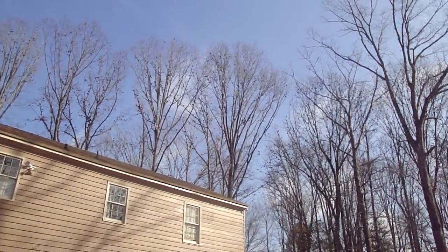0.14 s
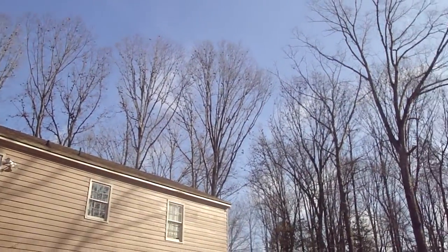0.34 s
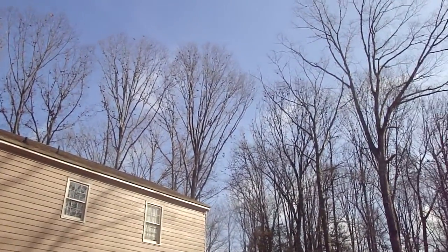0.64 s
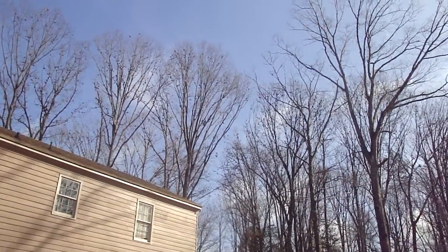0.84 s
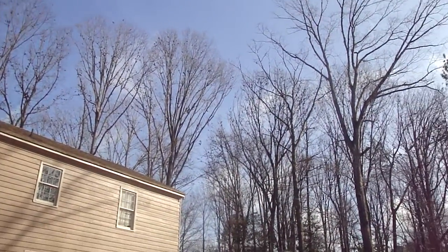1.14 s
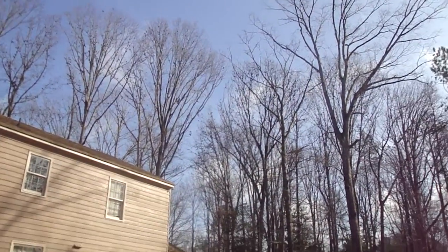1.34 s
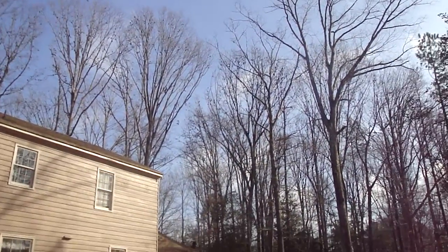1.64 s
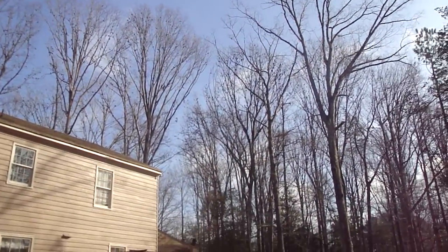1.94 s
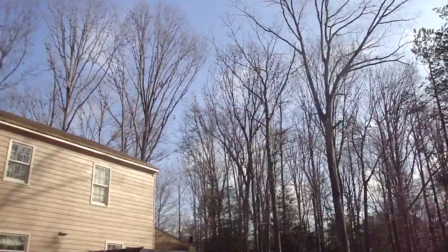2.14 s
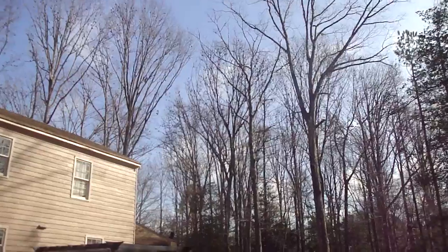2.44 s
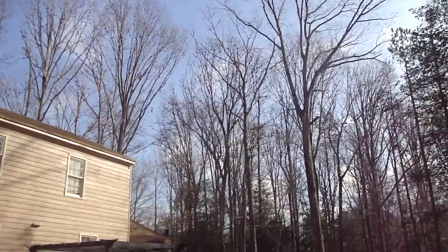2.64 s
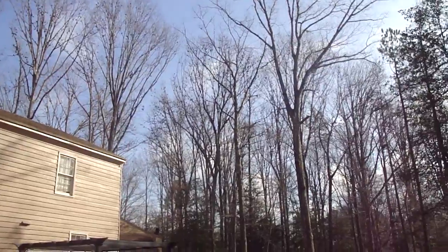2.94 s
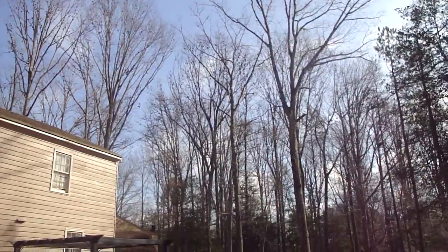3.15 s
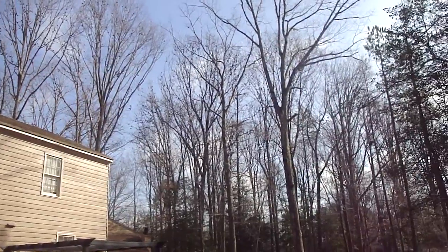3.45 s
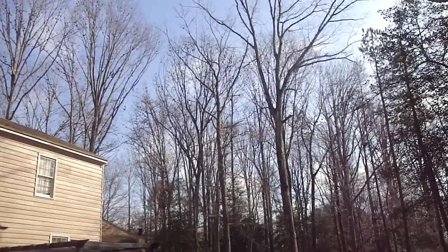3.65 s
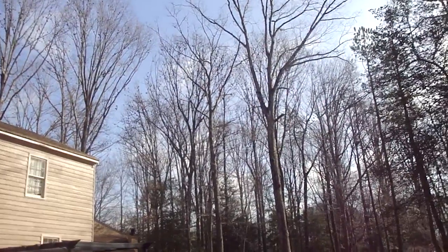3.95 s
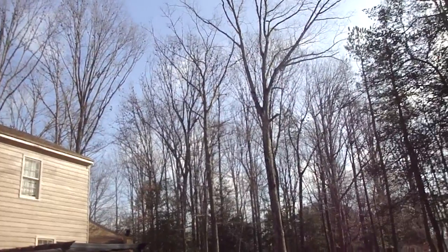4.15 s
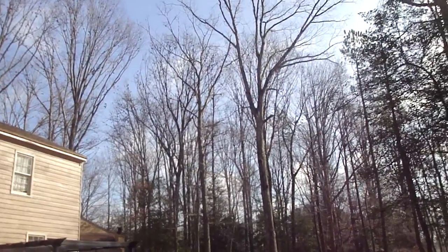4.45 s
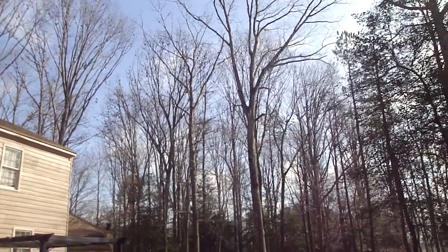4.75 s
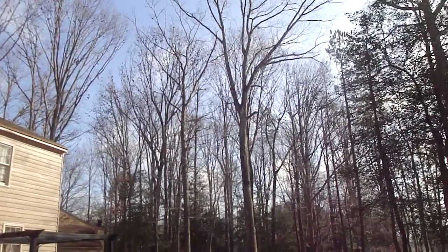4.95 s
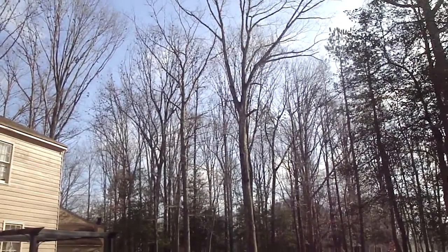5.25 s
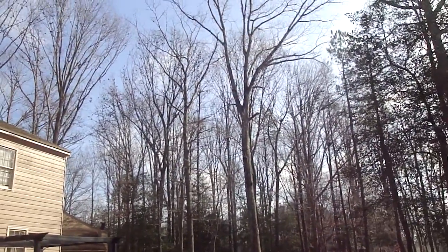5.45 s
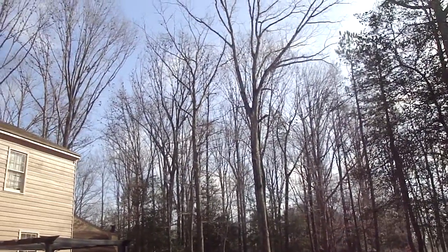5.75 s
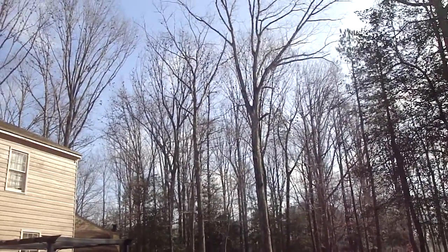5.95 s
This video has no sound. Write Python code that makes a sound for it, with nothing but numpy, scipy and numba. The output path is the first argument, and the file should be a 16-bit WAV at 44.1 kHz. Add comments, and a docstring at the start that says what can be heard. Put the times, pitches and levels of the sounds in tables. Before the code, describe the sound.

Steady outdoor bird din from start to end: hundreds of overlapping tiny calls form a grainy hiss, strongest in the middle-high range. Nearer birds add clear squeaks, thin high whistles and noisy rasps, sometimes clustered, sometimes sparse. The level flutters slightly but never stops. Barely audible dove coos come around three seconds and again near five. Faint low town rumble, short woodland echo, mono small-camera sound.

```python
"""Hundreds of blackbirds chatter in bare trees beyond a house, heard by a small mono camera microphone.
The nearest squeaks and squeals are frequency-modulated tones; rasps are the same with far wider modulation.
Near calls ring in a short scattered echo from the trunks. A middle crowd calls at random within the noise hiss
of far birds, over a town murmur of low-passed noise; a dove, slow gliding tones, coos faintly low down."""
import sys
import numpy as np
from scipy import signal
from scipy.fft import rfft, irfft
from scipy.io import wavfile
from scipy.ndimage import uniform_filter1d
from numba import njit

SR = 44100
rng = np.random.default_rng(int(sys.argv[2]) if len(sys.argv) > 2 else 0)


def bounce(signal):
    """Save signal as a 16-bit WAV file at the path given by the first command-line argument."""
    frames = np.transpose(np.atleast_2d(signal))
    limited = np.clip(frames, -1, 1)
    pcm = np.round(limited * 32767).astype(np.int16)
    wavfile.write(sys.argv[1], SR, pcm)


N = 268480  # samples in the scene


def undb(db):
    """Amplitude ratio: 20 dB is a factor of ten."""
    return 10 ** (np.asarray(db) / 20)


def level(x, db):
    """Normalisation: scale the signal to an RMS level in dB re 1."""
    return x * undb(db) / np.sqrt(np.mean(x ** 2))


def walk(rate_hz):
    """Low-passed noise: random values held 1 / rate_hz s, averaged twice over that time, scaled to spread 1."""
    hold = max(int(SR / rate_hz), 2)
    steps = np.repeat(rng.standard_normal(N // hold + 1), hold)
    smooth = uniform_filter1d(uniform_filter1d(steps, hold), hold)[:N]
    return smooth / np.std(smooth)


@njit
def syrinx(calls, shake, edge, buzz):
    """Frequency and amplitude modulation: one shaken tone per row.

    Row: t/s, duration/s, start, middle and end f/Hz, wobble/Hz per unit shake, peak amplitude before buzz.
    edge is the share of a call spent rising, and again falling; buzz is the depth of amplitude shaking.
    """
    out = np.zeros(len(shake))
    for k in range(len(calls)):
        start, size = int(calls[k, 0] * SR), int(calls[k, 1] * SR)
        first, middle, last = calls[k, 2], calls[k, 3], calls[k, 4]
        phase = 0.
        for i in range(min(size, len(out) - start)):
            u = i / size
            chance = (start + i + 7919 * k) % len(shake)  # each call reads another stretch of the shake
            # parabola through the three pitches
            bend = first * (1 - u) * (1 - 2 * u) + 4 * middle * u * (1 - u) + last * u * (2 * u - 1)
            phase += 2 * np.pi * (bend + calls[k, 5] * shake[chance]) / SR
            swell = np.sin(np.pi / 2 * min(1., min(u, 1 - u) / edge))
            size_shake = 1 + buzz * shake[chance - 5000]  # apart from the pitch shake
            out[start + i] += calls[k, 6] * swell * size_shake * np.sin(phase)
    return out


def tones(rows, wobble_hz, shake_hz, edge, buzz):
    """Nearly periodic oscillation: a small random wobble leaves gliding calls almost pure."""
    s, length, hz, glide, db = np.transpose(rows)
    middle_hz = hz + 0.62 * glide  # 62 % of the glide is done halfway through
    wobble = np.full(len(s), wobble_hz)
    amplitude = np.sqrt(2) * undb(db)  # sine peak from RMS level
    calls = np.column_stack([s, length, hz, middle_hz, hz + glide, wobble, amplitude])
    return syrinx(calls, walk(shake_hz), edge, buzz)


def trunks(x):
    """Multiple scattering: direct sound plus decaying random reflections from trunks and the house wall."""
    t60_s, scatter_db, onset_s = 0.2, -12.5, 0.0064
    t = np.arange(int(t60_s * SR)) / SR
    decay = undb(-60 * t / t60_s)
    tail = rng.standard_normal(len(t)) * decay * np.minimum(t / onset_s, 1)
    tail /= np.sqrt(np.sum(tail ** 2))
    return x + undb(scatter_db) * signal.fftconvolve(x, tail)[:N]


def crowd():
    """Random superposition: middle-distance birds call at random moments, pitches and distances."""
    count = 9000
    draw = rng.random((count, 7)).T
    start_s = draw[0] * N / SR
    length_s = 0.0148 + 0.068 * draw[6] ** 2
    hz = 1800 + 9200 * draw[1]
    glide = 1 + 0.03987 * (2 * draw[2:4] - 1)  # pitch ratios of the two halves
    middle_hz = hz * glide[0]
    end_hz = middle_hz * glide[1]
    wobble_hz = np.where(draw[4] < 0.6, 30 + 400 * draw[4], 1400.)  # clear to hoarse squeak, or wide rasp
    amplitude = undb(15.4 * draw[5] ** 2)  # few are near and loud
    calls = np.column_stack([start_s, length_s, hz, middle_hz, end_hz, wobble_hz, amplitude])
    return syrinx(calls, np.tanh(walk(1500.)), edge=0.12, buzz=0.23)


def flock():
    """Spectral shaping: hiss and crowd share one colour; two bird bands swell apart over a town murmur."""
    # base levels of the flock: t/s, low voices level/dB, shrill voices level/dB
    liveliness = [(0, -33.5, -37), (.64, -33.5, -40), (1, -34, -38.5), (2.17, -32.5, -39),
                  (2.9, -33.5, -38), (3.22, -33.5, -38.5), (3.58, -32, -37.5), (3.85, -33.5, -36.5),
                  (4.25, -33.5, -37), (4.51, -33.5, -36.5), (4.78, -32.5, -39.5), (5.02, -33, -39.5),
                  (5.2, -33.5, -35.5), (5.5, -32.5, -37.5), (6.09, -33.5, -38.5)]
    # colour of flock, air and microphone together, before the bands are levelled: f/Hz, relative density level/dB
    colour = [(15, -69), (25, -42.5), (140, -23.5), (386, -22), (728, -15.5), (1240, -6.5), (2280, -2.5),
              (3170, -1), (4410, -8), (7700, -10.5), (10700, -28.5), (22000, -57)]
    crowd_share, shrill_hz, murmur_db, bout_db = 0.29, 3980, -53.5, 0.6  # share is of power

    hz = np.maximum(np.arange(N // 2 + 1) * SR / N, 1.)
    colour_hz, colour_db = np.transpose(colour)
    gain = undb(np.interp(np.log(hz), np.log(colour_hz), colour_db))
    far = rfft(level(rng.standard_normal(N), 0)) * gain
    middle = rfft(level(trunks(crowd()), 0)) * gain
    share = crowd_share / (1 + (2600 / hz) ** 6)  # lower down only the hiss of far birds is left
    both = np.sqrt(1 - share) * far + np.sqrt(share) * middle

    shrill = 1 / (1 + (shrill_hz / hz) ** 6)
    birds = 1 / (1 + (700 / hz) ** 4)
    low = level(irfft(both * birds * (1 - shrill), N), 0)
    high = level(irfft(both * shrill, N), 0)
    town = level(irfft(both * (1 - birds), N), 0)

    time = np.arange(N) / SR
    s, low_db, shrill_db = np.transpose(liveliness)
    bouts = bout_db * walk(6.32)  # neighbours set each other off in short bouts
    low_voices = low * undb(np.interp(time, s, low_db) + bouts)
    shrill_voices = high * undb(np.interp(time, s, shrill_db) + 2 * bouts)
    return low_voices + shrill_voices + town * undb(murmur_db)


def dove():
    """Slow modulation: a barely shaken low tone is heard as a soft coo."""
    # coos: t/s, duration/s, start f/Hz, glide/Hz, level/dB
    coos = [(2.8, .66, 488, -5, -61), (4.5, .34, 490, -18, -57.5), (4.93, .64, 482, -3, -59.5)]
    return tones(coos, wobble_hz=2., shake_hz=10., edge=0.2, buzz=0.15)


def rasps():
    """Chaotic vibration: membrane flapping throws the pitch over a wide band, with a faint octave above."""
    # harsh rasps of near birds: t/s, duration/s, nominal centre f/Hz (sounded 1 % lower), level/dB
    harsh_calls = [(0, 0.054, 8400, -47), (0.114, 0.091, 7770, -39.5), (0.206, 0.11, 2190, -38.5),
                   (0.247, 0.13, 5930, -37), (0.797, 0.15, 2870, -37), (1.03, 0.13, 3710, -42),
                   (1.055, 0.09, 5920, -41), (1.29, 0.15, 3185, -36), (1.58, 0.18, 4860, -35.5),
                   (1.72, 0.14, 4520, -37), (2.304, 0.12, 6580, -43), (2.371, 0.1, 3220, -49),
                   (2.435, 0.15, 7300, -44), (2.773, 0.15, 4620, -39), (2.835, 0.072, 8050, -47),
                   (3.089, 0.13, 5570, -35.5), (3.57, 0.12, 3980, -37), (3.94, 0.051, 5020, -36),
                   (4.056, 0.15, 4500, -36.5), (4.189, 0.076, 5700, -41), (4.46, 0.062, 8700, -43),
                   (4.55, 0.14, 8950, -48), (4.597, .075, 3650, -41), (5.001, 0.067, 8480, -49),
                   (5.056, 0.19, 4790, -42), (5.22, 0.2, 5820, -41), (5.342, 0.055, 9500, -49),
                   (5.526, 0.14, 5780, -38), (5.646, 0.089, 4920, -39), (5.865, 0.14, 4470, -40),
                   (6.01, 0.077, 5650, -42)]
    width_hz, octave_db = 2000, -15.5  # width per unit of frequency ratio; octave re the fundamental
    s, length, hz, db = np.transpose(harsh_calls)
    flap = np.tanh(walk(1800.))

    def partial(ratio, over_db):
        """Harmonic scaling: pitch and its swing are multiplied by the same ratio."""
        pitch = ratio * hz
        swing = np.full(len(s), 0.5 * ratio * width_hz)
        amplitude = np.sqrt(2) * undb(db + over_db)
        return np.column_stack([s, length, pitch, pitch, pitch, swing, amplitude])

    calls = np.vstack([partial(0.99, 0), partial(2, octave_db)])
    return syrinx(calls, flap, edge=0.42, buzz=0.4)


def squeals():
    """Random point process: rows of fairly near calls scattered around the flock's usual pitch."""
    # swells of the squealing: t/s, softest call level/dB
    chatter = [(0, -49), (.3, -50.5), (.7, -54), (.9, -48), (1.1, -53), (1.35, -48), (1.55, -47), (2, -50),
               (2.35, -52.5), (2.55, -53), (2.9, -47.5), (3.4, -51.5), (3.95, -48.5), (4.15, -49),
               (4.35, -51.5), (4.65, -45), (4.85, -46.5), (5.2, -53), (5.45, -52), (6.09, -46.5)]
    count, usual_hz, range_db = 1300, 3240, 6
    spread, glide_share = 0.062, 0.022  # standard deviations: of log pitch, and of glide as a share of pitch
    even, bell = rng.random((count, 3)).T, rng.standard_normal((count, 2)).T
    s = even[0] * N / SR
    length_s = 0.01 + 0.035 * even[1] ** 2
    hz = usual_hz * np.exp(spread * bell[0])
    glide_hz = glide_share * bell[1] * hz
    db = np.interp(s, *np.transpose(chatter)) + range_db * even[2]
    return np.column_stack([s, length_s, hz, glide_hz, db])


def squeaks():
    """Self-sustained oscillation: the nearest squeaks and the random squeals are clear, slightly shaken tones."""
    # clear squeaks of the nearest birds: t/s, duration/s, start f/Hz, glide/Hz, level/dB
    nearest = [(0.008, 0.015, 2830, 50, -36.5), (0.018, 0.019, 2590, -30, -36.5),
               (0.069, 0.045, 3070, 20, -36.0), (0.102, 0.014, 8300, 850, -42),
               (0.196, 0.024, 9100, 950, -43), (0.214, 0.03, 10050, 130, -39.5),
               (0.242, 0.008, 10200, 600, -44), (0.28, 0.075, 6400, -300, -39),
               (0.284, 0.015, 2460, -60, -38.0), (0.42, 0.029, 7340, 30, -39),
               (0.842, 0.052, 3320, -200, -34), (0.895, 0.019, 2110, 130, -38.0),
               (0.954, 0.023, 2550, 50, -34.0), (0.971, 0.019, 2810, -80, -37.5),
               (1.027, 0.017, 3520, 40, -37.5), (1.1, 0.075, 6270, 80, -44),
               (1.114, 0.042, 4200, 90, -40.5), (1.2, 0.017, 6470, -70, -42), (1.24, 0.09, 6600, 300, -46),
               (1.632, 0.023, 3280, -160, -36.0), (1.689, 0.05, 8100, -180, -45),
               (1.73, 0.023, 4060, 30, -40), (1.757, 0.016, 3830, 0, -39.0), (1.765, 0.052, 5030, 0, -42),
               (1.783, 0.022, 3860, -260, -39.5), (1.791, 0.033, 4730, -60, -44.0),
               (1.806, 0.025, 3760, 20, -39.5), (1.829, 0.03, 2620, 40, -38.5),
               (1.885, 0.045, 6600, 150, -45), (1.929, 0.026, 3130, -40, -35.5),
               (2.073, 0.022, 3940, -20, -39.5), (2.118, 0.03, 4390, -40, -39),
               (2.179, 0.035, 4160, 80, -39), (2.183, 0.02, 8750, 350, -45), (2.21, 0.07, 9020, -60, -46.5),
               (2.27, 0.07, 6250, 150, -46), (2.33, 0.045, 6400, 750, -41), (2.344, 0.03, 3590, -30, -39.0),
               (2.369, 0.036, 8400, 40, -46), (2.383, 0.019, 3290, 200, -36.0),
               (2.153, 0.04, 3240, 60, -36.5), (2.405, 0.05, 3300, -250, -37),
               (2.417, 0.123, 8030, 40, -46), (2.542, 0.023, 3960, -100, -40.0),
               (2.6, 0.185, 8450, -780, -41.5), (2.611, 0.025, 2970, 180, -34.5),
               (2.652, 0.022, 3130, -30, -36.0), (2.749, 0.02, 2690, -30, -37.5),
               (2.81, 0.029, 3700, -90, -38.0), (2.842, 0.019, 3810, -10, -38.5),
               (2.866, 0.034, 5170, -300, -42), (2.868, 0.027, 8120, 220, -41),
               (2.912, 0.029, 3470, -120, -36.0), (2.944, 0.029, 2370, -70, -37.5),
               (3.058, 0.055, 8650, -350, -45), (3.123, 0.066, 8930, -30, -51),
               (3.137, 0.042, 4280, 490, -40.5), (3.161, 0.035, 4330, 30, -44.0),
               (3.324, 0.016, 3460, 110, -37.5), (3.344, 0.022, 4540, 30, -42.0),
               (3.366, 0.018, 5500, 40, -42), (3.397, 0.05, 5620, -200, -37.5),
               (3.446, 0.028, 5480, 250, -39.5), (3.482, 0.026, 8720, -280, -47),
               (3.538, 0.03, 5680, 40, -43), (3.547, 0.11, 4825, -50, -37), (3.549, 0.041, 4520, 10, -42.0),
               (3.57, 0.086, 5520, 0, -40.5), (3.57, 0.07, 6010, -20, -40),
               (3.584, 0.052, 3280, -20, -34.5), (3.595, 0.052, 4530, -20, -44.0),
               (3.614, 0.02, 3700, 10, -36.0), (3.677, 0.02, 4120, 140, -39.5),
               (3.763, 0.045, 8200, 340, -41), (3.801, 0.025, 3760, 80, -40.0),
               (4.003, 0.019, 3750, 80, -39.0), (4.067, 0.02, 3180, -80, -34.5),
               (4.076, 0.045, 3670, 110, -38), (4.109, 0.019, 3220, -210, -35.5),
               (4.11, 0.04, 4850, -50, -41), (4.124, 0.032, 4060, -120, -41.0),
               (4.14, 0.02, 3700, -50, -37.5), (4.191, 0.081, 9450, -420, -50.5),
               (4.256, 0.028, 4410, -360, -38.0), (4.389, 0.023, 5180, -30, -41),
               (4.415, 0.025, 3900, 750, -42), (4.43, 0.048, 3550, 70, -39.5),
               (4.479, 0.024, 5120, 260, -41), (4.515, 0.12, 5480, 100, -44),
               (4.539, 0.036, 3340, 70, -35.5), (4.543, 0.037, 6840, 90, -43), (4.55, 0.11, 9700, -30, -57),
               (4.631, 0.023, 3990, 120, -41.5), (4.636, 0.028, 3440, -130, -33.0),
               (4.646, 0.026, 4520, 60, -41.0), (4.665, 0.054, 3400, -10, -32.0),
               (4.671, 0.015, 3180, 10, -35.5), (4.724, 0.017, 2490, -70, -37.0),
               (4.753, 0.042, 3160, -50, -34.0), (4.795, 0.023, 2890, 230, -36.0),
               (4.993, 0.051, 4390, -60, -42.0), (5.01, 0.035, 7300, 550, -44),
               (5.028, 0.095, 3910, 190, -39.5), (5.042, 0.065, 7370, -200, -43),
               (5.136, 0.18, 6000, -470, -41.5), (5.212, 0.015, 4300, -20, -41.5),
               (5.36, 0.045, 6140, 0, -44.5), (5.421, 0.019, 2850, 0, -36.5),
               (5.44, 0.022, 2390, 70, -38.5), (5.462, 0.033, 2830, 90, -31.5),
               (5.473, 0.075, 4280, 30, -38.0), (5.489, 0.045, 6550, 120, -41),
               (5.53, 0.025, 6700, 600, -44), (5.586, 0.017, 3040, 110, -35.5),
               (5.642, 0.02, 4590, -10, -40.5), (5.646, 0.024, 8280, 90, -42),
               (5.721, 0.022, 4410, -120, -42.0), (5.74, 0.035, 7050, 100, -44),
               (5.752, 0.019, 3180, 10, -35.5), (5.759, 0.026, 2220, 50, -39.5),
               (5.761, 0.039, 3480, -280, -34.0), (5.762, 0.035, 2450, 50, -35.0),
               (5.904, 0.073, 4690, -150, -42.5), (6.064, 0.028, 3060, -80, -37.5)]
    rows = np.vstack([nearest, squeals()])
    return tones(rows, wobble_hz=22., shake_hz=200., edge=0.16, buzz=0.3)


def scene():
    """Superposition: flock, dove and echoing near calls add into two identical channels."""
    near = trunks(squeaks() + rasps())
    mono = flock() + dove() + near
    return np.array([mono, mono])


def record(dry):
    """Band limitation: the camera's elliptic low-pass cuts the top steeply."""
    top_hz = 10990
    # order 12, 0.3 dB passband ripple, 60 dB stopband attenuation
    low_pass = signal.ellip(12, 0.3, 60, top_hz, fs=SR, output="sos")
    return signal.sosfilt(low_pass, dry)


dry = scene()
out = record(dry)
bounce(out)
```